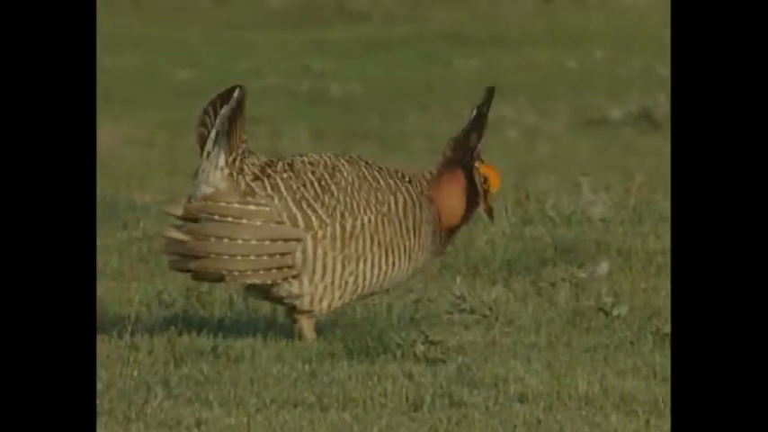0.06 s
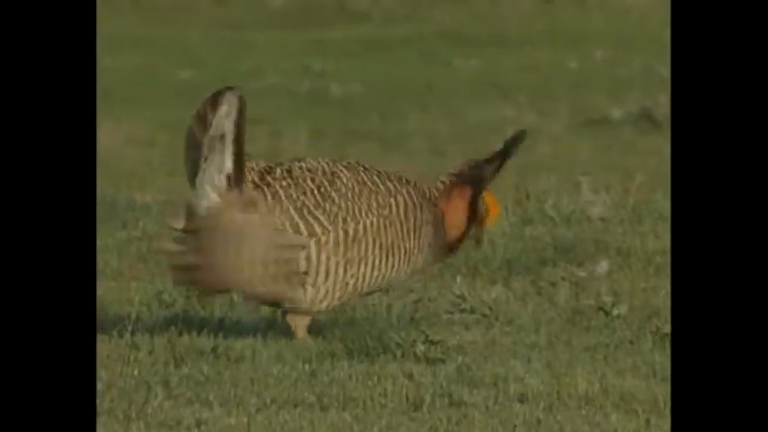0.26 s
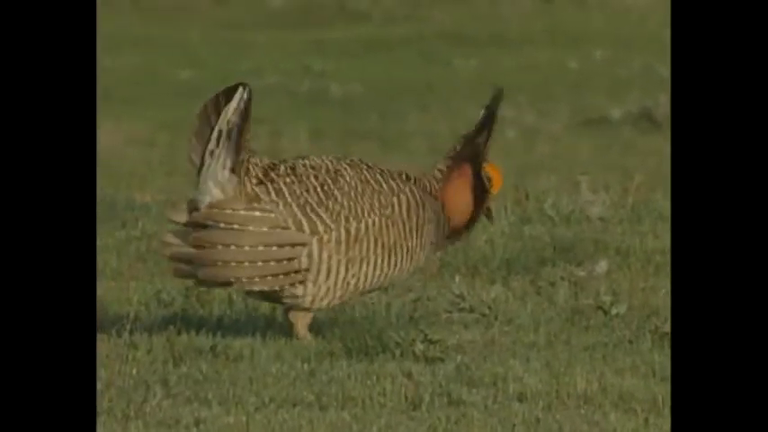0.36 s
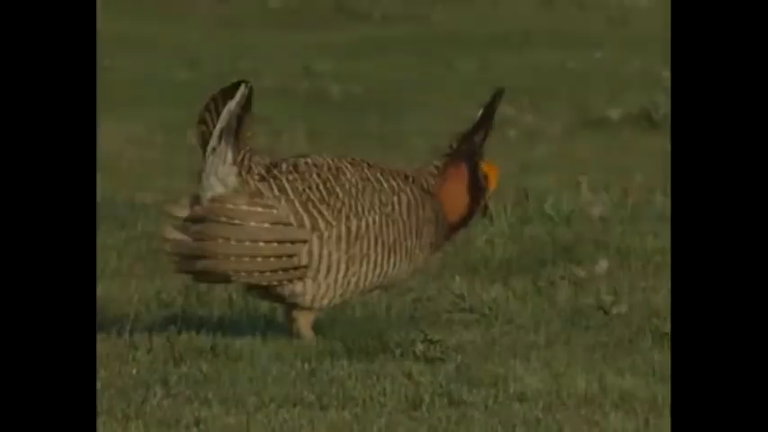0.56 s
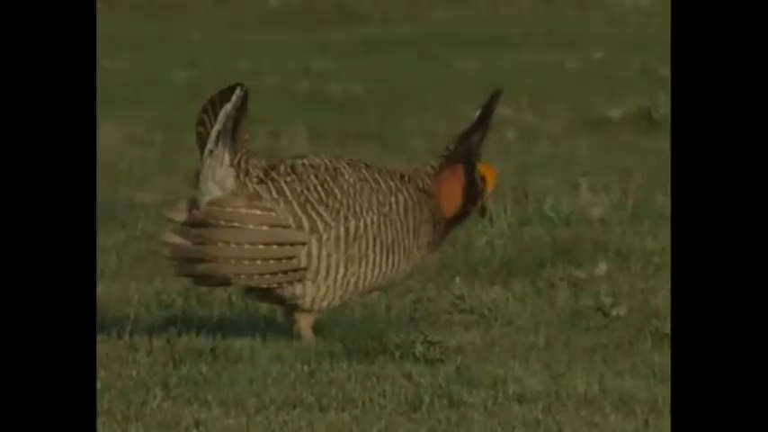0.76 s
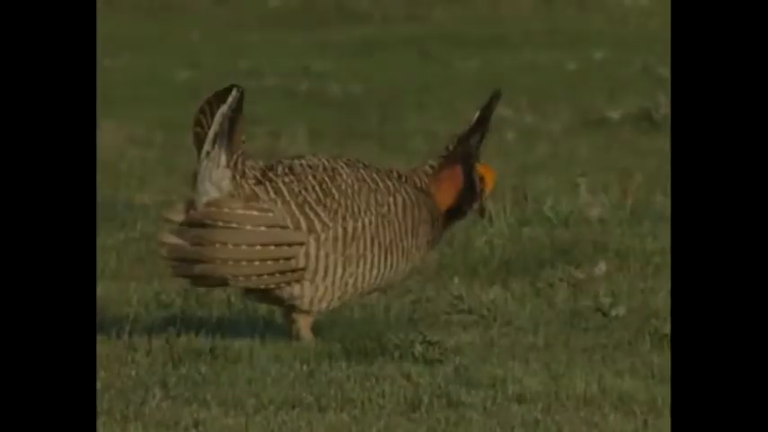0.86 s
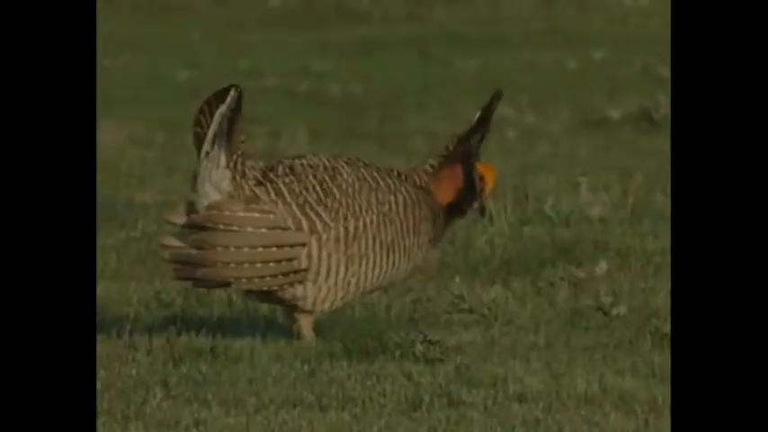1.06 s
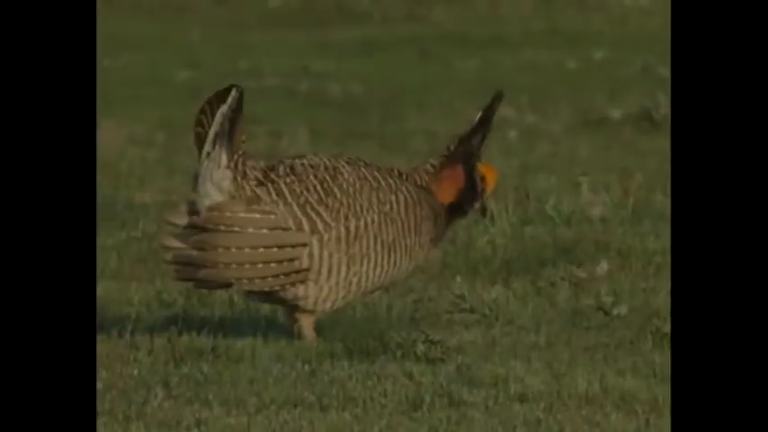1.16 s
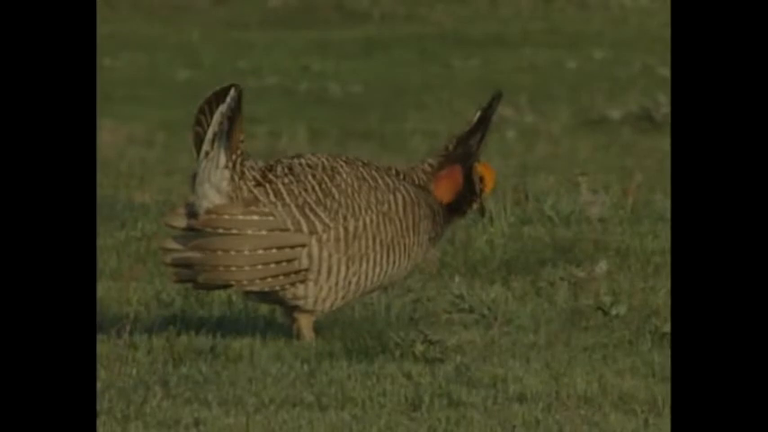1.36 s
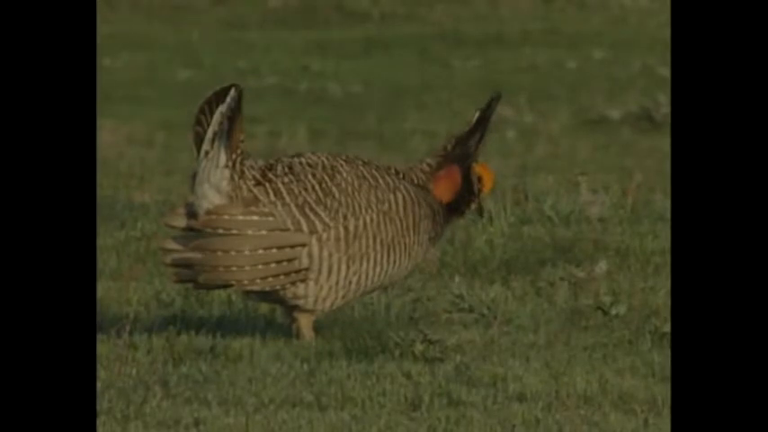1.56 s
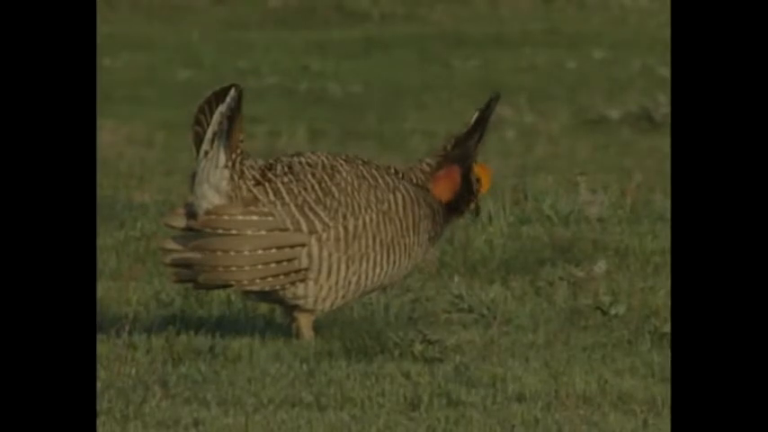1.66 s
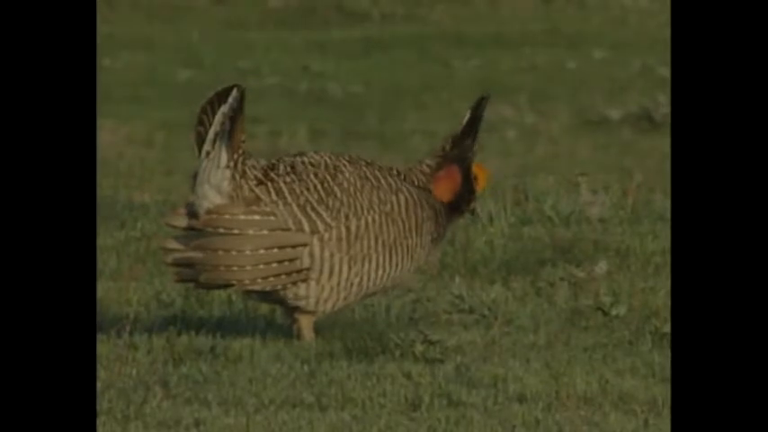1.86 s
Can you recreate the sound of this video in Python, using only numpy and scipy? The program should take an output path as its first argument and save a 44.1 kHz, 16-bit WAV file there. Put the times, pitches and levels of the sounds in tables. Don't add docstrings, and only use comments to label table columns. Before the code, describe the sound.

Bubbling low grouse gobbles tumble over each other, then three cracking hoots, over soft wind rumble.

```python
import sys
import numpy as np
from scipy import signal
from scipy.fft import rfft, irfft
from scipy.io import wavfile
from scipy.ndimage import uniform_filter1d

SR = 44100
rng = np.random.default_rng(int(sys.argv[2]) if len(sys.argv) > 2 else 0)


def generate_wav(signal):
    frames = np.transpose(np.atleast_2d(signal))
    scaled = np.clip(frames, -1, 1) * 32767
    pcm = np.round(scaled).astype(np.int16)
    wavfile.write(sys.argv[1], SR, pcm)


def ratio_of_db(decibels):
    return 10 ** (np.asarray(decibels, float) / 20)


N = 83790
T = np.arange(N) / SR


def walk(rate):
    k = int(SR / rate)
    held = np.repeat(rng.standard_normal(N // k + 1), k)
    return 1.41 * uniform_filter1d(uniform_filter1d(held, k), k)[:N]


def curve(s, v, smooth_s):
    return uniform_filter1d(np.interp(T, s, v), int(smooth_s * SR) + 1)


def gate(s):
    edge_s = .007
    return np.clip(np.minimum(T - s[0] + edge_s, s[-1] + edge_s - T) / edge_s, 0, 1) ** 2


def turn(hz):
    return 2 * np.pi * (np.cumsum(hz) / SR + rng.random())


def coloured(points, db):
    hz, gain = np.array(points, float).T
    f = np.maximum(np.arange(N // 2 + 1) * SR / N, 1)
    weight = ratio_of_db(np.interp(np.log(f), np.log(hz), gain, -70, -70))
    x = irfft(rfft(rng.standard_normal(N)) * weight, N)
    return x * ratio_of_db(db) / x.std()


def throat(s, hz, partial_db):
    phase = turn(curve(s, hz, 0.0013) + 6 * walk(61.06))
    tone = 0
    for k, db in enumerate(partial_db, 1):
        tone = tone + ratio_of_db(curve(s, db, 0.0054)) * np.sin(k * phase)
    return np.sqrt(2) * tone * gate(s) * ratio_of_db(1.2 * walk(89.84))


# t/s, f/Hz, level/dB
GOBBLE_A = [(.206, 617, -46), (.22, 540, -39), (.229, 813, -41.5), (.24, 845, -48.5), (.273, 737, -53)]
GOBBLE_B = [(.235, 419.2, -61), (.256, 484.6, -50.5), (.271, 496, -39.5), (.281, 645, -36.5),
            (.292, 925, -41.5), (.3, 986, -65)]
GOBBLE_C = [(.285, 680, -44), (.3, 769, -52), (0.313, 793, -55.5), (0.322, 718, -50), (0.335, 831, -42.5),
            (.346, 738, -34.5), (.356, 584, -31.5), (0.367, 474, -38.5)]
GOBBLE_D = [(.308, 503, -59), (.322, 629, -58), (.329, 562, -41.5), (0.337, 390, -48.5),
            (.355, 421.4, -42.5), (0.365, 460, -66)]
GOBBLE_E = [(.372, 494, -42), (.387, 585, -34), (0.398, 718, -47), (.413, 585, -44), (0.422, 614, -43)]
GOBBLE_F = [(0.39, 468, -38.5), (.4, 558, -41.5), (0.406, 534.5, -57), (0.42, 500, -63),
            (0.441, 474, -43.5)]
GOBBLE_G = [(0.391, 832.6, -54), (0.405, 994, -42.5), (0.42, 805, -38.5), (0.431, 885, -53.5),
            (0.442, 845, -47), (0.46, 901, -44)]
GOBBLE_H = [(.436, 542, -52.5), (.443, 643, -33), (.451, 742, -45), (0.471, 866, -43.5),
            (0.478, 810, -47.5), (0.487, 675, -39.5), (0.502, 640, -50)]
GOBBLE_I = [(0.597, 700, -64), (0.619, 654.4, -58), (0.691, 667, -56.5)]
# t/s, f/Hz, level/dB
RIPPLE = [(.4, 720, -41), (.41, 559.6, -45), (0.419, 473, -54), (.43, 641, -52), (.44, 448, -46.5),
          (.452, 520, -56)]
# t/s, f/Hz, level/dB
SLUR_A = [(.51, 535, -40.5), (0.525, 634, -31.5), (0.535, 686, -37), (0.54, 725, -31), (.548, 844, -56.5)]
SLUR_B = [(.618, 561.3, -67.5), (.65, 569, -48), (0.67, 537, -48), (0.68, 555, -61), (.7, 549, -38),
          (0.708, 574, -45), (.718, 753, -40)]
SLUR_C = [(0.817, 738, -70), (.829, 541, -65), (.862, 534, -50), (0.88, 507, -54), (0.886, 533, -63.5),
          (0.911, 538, -44.5), (.922, 647, -45)]
# t/s, f/Hz, level/dB
FAR_A = [(1.28, 561, -63.5), (1.295, 413, -64.5), (1.334, 510.4, -57.5), (1.364, 409, -64),
         (1.387, 544, -57.5), (1.396, 740, -73)]
FAR_B = [(1.43, 448.6, -61), (1.446, 706, -67), (1.48, 662, -76.5), (1.495, 493, -71), (1.509, 655, -57),
         (1.524, 740, -97)]
# t/s from its start, f/Hz, relative level/dB
STEP_SHAPE = [(0, 500, -6), (.028, 584, 1), (0.039, 798, -6), (.065, 800, -7), (.085, 750, -7)]
# t/s, level/dB
STEPS = [
    (0.0, -66),
    (0.112, -64.5),
    (1.186, -78),
]


def glides():
    steps = [np.array(STEP_SHAPE) + (at, 0, db) for at, db in STEPS]
    pure = [GOBBLE_B, GOBBLE_C, GOBBLE_D, GOBBLE_E, GOBBLE_F, GOBBLE_G, GOBBLE_H, GOBBLE_I, RIPPLE,
            SLUR_A, FAR_A, FAR_B] + steps
    rich = [GOBBLE_A, SLUR_B, SLUR_C]
    out = 0
    for group, octave_db in ((pure, -36), (rich, -17)):
        for rows in group:
            s, hz, db = np.array(rows, float).T
            weakening = np.maximum(hz - 565, 0) * .3 + np.maximum(db + 50, 0) * 1.3
            out = out + throat(s, hz, [db, db + octave_db - weakening])
    return out


# t/s of the break, level/dB, lead-in stretch, tail stretch, pitch factor
BREAKS = [
    (0.5766, -38.5, 1.3, 0.78, 0.97),
    (0.745, -40, 1.2, 1.05, 1),
    (.954, -40, 0.837, 0.92, 1.01),
]
# t/s from the break, f/Hz, tone level/dB, air-sac level/dB
BREAK_SHAPE = [(-.017, 620, -22.5, -64), (-.011, 789, -2.5, -48), (-.006, 748, -7.5, -41),
               (0, 713, 8.5, -45), (.004, 491, -9, -12), (.008, 420, -12, -3.5), (0.015, 373, -17.5, -4.5),
               (0.025, 350, -23.5, -5), (0.032, 340, -28, -26)]


def broken_notes():
    twelfth_db, sac_top_hz = -28.5, 775
    s, hz, tone, octave = np.array(BREAK_SHAPE, float).T
    out = 0
    for at, db, lead, tail, pitch in BREAKS:
        when = at + np.where(s < 0, lead, tail) * s
        faint = db + octave + twelfth_db
        out = out + throat(when, pitch * hz, [db + tone, faint, faint])
        out = out + throat(when, pitch * np.minimum(2 * hz, sac_top_hz), [db + octave])
    return out


# f/Hz, spectral level/dB
NOISE_BAND = [(200, -15), (500, -6), (850, -4), (1100, 2.5), (1450, -6.5), (1650, -22)]


def loud_noise(lek):
    loudness = np.sqrt(np.abs(uniform_filter1d(lek ** 2, SR // 50)))
    return coloured(NOISE_BAND, -38) * loudness


# t/s, f/Hz, level/dB, buzz depth 0-1
CHIRPS = [
    [(.007, 1590, -73, .03), (.012, 1715, -68, .03), (.018, 1835, -62, .03), (.024, 1880, -59, .08),
     (.029, 1890, -60, .5), (.037, 1875, -60, .3), (.047, 1835, -60, .25), (.055, 1770, -66, .45),
     (.061, 1660, -80, .5)],
    [(1.408, 1570, -68, .03), (1.414, 1730, -60, .03), (1.423, 1845, -52, .04), (1.427, 1848, -51, .42),
     (1.435, 1835, -53, .4), (1.441, 1853, -50, .15), (1.449, 1835, -51, .2), (1.455, 1750, -58, .55),
     (1.461, 1610, -76, .6)],
]
# multiple of the pitch, level/dB
CHIRP_ORDERS = [(1, -21.5), (2, 2.5), (3, 2), (4, -10.5), (5, -35), (6, -27.5)]


def chirps():
    buzz_spread, low_side, second_side, rasp_depth = 0.59, .12, 1, 0.21
    onset_bright_db = 9
    out = 0
    for rows, buzz_hz in zip(CHIRPS, (305, 350)):
        s, hz, db, buzz = np.array(rows, float).T
        pitch = curve(s, hz, 0.0032)
        phase = turn(pitch + 8 * walk(400))
        side = np.exp(1j * turn(buzz_hz + buzz_spread * (hz.max() - pitch) + 45 * walk(300)))
        depth = np.clip(curve(s, buzz, 0.0018), 0, .6)
        rasp = rasp_depth * (walk(2500) + 1j * walk(2500))
        lowness = np.clip((hz.max() - pitch) / (hz.max() - hz[0]), 0, 1)
        note = 0
        for k, gain_db in CHIRP_ORDERS:
            upper = side + second_side * (k / 2 - .7) * depth * side ** 2
            lower = low_side * (k - 1) / side
            partial = np.imag(np.exp(1j * k * phase) * (1 + depth * (upper + lower + rasp)))
            note = note + ratio_of_db(gain_db + onset_bright_db * max(k - 3, 0) * lowness) * partial
        out = out + np.sqrt(2) * note * ratio_of_db(curve(s, db, 0.0022)) * gate(s) ** 20
    return out


# start t/s, length t/s, first f/Hz, last f/Hz, level/dB
WHISTLES = [(0.909, 0.083, 2750, 2610, -76), (1.06, 0.181, 3386, 3250, -76),
            (1.345, 0.068, 2065, 2025, -70), (1.73, .028, 1390, 1370, -78.5),
            (1.846, 0.052, 1775, 1770, -66.5), (0.225, 0.024, 5000, 4970, -77),
            (1.198, 0.036, 1715, 1700, -79), (1.548, 0.026, 3350, 2500, -82),
            (1.464, 0.024, 2300, 2070, -79), (1.9, .018, 2560, 2550, -80.5), (1.73, 0.067, 2250, 2400, -88),
            (1.838, 0.011, 1450, 1770, -73), (.11, .035, 1850, 2000, -81.5), (.955, 0.042, 1820, 2000, -85)]
# start t/s, length t/s, first f/Hz, last f/Hz, level/dB
COOS = [(1.56, 0.041, 590, 498, -66.5), (1.593, 0.042, 485, 462, -66.5), (1.532, 0.033, 480, 570, -75),
        (1.713, .035, 400, 470, -71), (1.758, 0.02, 540, 530, -74), (1.779, .014, 540, 630, -67.5),
        (1.792, 0.029, 600, 450, -70), (1.826, .016, 500, 590, -70), (1.845, 0.019, 820, 706, -65),
        (1.859, 0.036, 430, 404, -65), (1.87, 0.031, 830, 770, -70), (1.051, 0.016, 740, 740, -68.5),
        (1.082, 0.012, 760, 740, -72), (1.193, .02, 420, 457, -68), (1.397, 0.0338, 428, 440, -71),
        (1.403, .02, 640, 606, -63)]


def whistles():
    swell, fade = 0.4, 0.1
    out = 0
    for at, length, hz0, hz1, db in WHISTLES + COOS:
        u = (T - at) / length
        env = np.clip(np.minimum(u / swell + 0.2, (1 - u) / fade), 0, 1) * np.clip(u * 10, 0, 1)
        pitch = hz0 + (hz1 - hz0) * np.clip(u, 0, 1) + 5 * walk(50.25)
        out = out + np.sqrt(2) * ratio_of_db(db + 1.86 * walk(60.1)) * env * np.sin(turn(pitch))
    return out


# t/s, level/dB
GUST = [(0, -65.5), (.2, -61), (.28, -48.5), (.42, -51.5), (.63, -47.5), (.72, -57), (.9, -63.5),
        (1.0, -55), (1.151, -53), (1.25, -60), (1.48, -56), (1.9, -67)]
# f/Hz, spectral level/dB
BUFFET = [(15, -8), (30, -1), (95, -1), (125, -8.5), (160, -45)]
# f/Hz, spectral level/dB
RUMBLE = [(60, -9.5), (90, -4), (110, 0), (132, -9.5), (152, -23.5), (230, -16.5), (500, -31.5),
          (900, -40.5)]


def wind():
    s, db = np.array(GUST).T
    gust = coloured(BUFFET, 0.5) * ratio_of_db(curve(s, db, 0.034) + 0.5 * walk(21.1))
    return gust + coloured(RUMBLE, -57.5) * ratio_of_db(0.76 * walk(13.9))


# f/Hz, level/dB, decay time t60/s
TICK_MODES = [(750, -2, 0.01), (1220, 2, 0.0037), (1780, -2.5, 0.0041), (2720, -14, 0.0043),
              (3940, -3, 0.0028)]


def motor():
    turn_s, ticks_at_s, jitter_s = .05005, (.0144, .0403), .0005
    tick_db, scatter_db = -66.5, 2.5
    at = (np.arange(0, N / SR, turn_s)[:, None] + ticks_at_s).ravel()
    chance = rng.standard_normal((len(at), 1 + len(TICK_MODES)))
    where = np.clip(((at + jitter_s * chance[:, 0]) * SR).astype(int), 0, N - 1)
    t = T[:SR // 50]
    out = 0
    for k, (hz, db, t60) in enumerate(TICK_MODES):
        hits = np.zeros(N)
        hits[where] = ratio_of_db(tick_db + db + scatter_db * chance[:, k + 1])
        ring = np.sin(2 * np.pi * hz * t) * np.exp(-np.log(1000) * t / t60)
        out = out + signal.fftconvolve(hits, ring)[:N]
    return out


def hum():
    return ratio_of_db(-92 + 2.2 * walk(9.2)) * np.sqrt(2) * np.sin(turn(np.full(N, 11025)))


def scatter(x):
    n = SR // 8
    tail = rng.standard_normal(n) * np.exp(-np.arange(n) / SR / .025)
    return ratio_of_db(-26) * signal.fftconvolve(x, tail / np.sqrt(np.sum(tail ** 2)))[:N]


# f/Hz, spectral level/dB
HISS = [(300, 8.5), (1200, 1), (6000, -2), (12600, -2)]
# f/Hz, spectral level/dB
SIDE_HISS = [(1500, -14), (5000, -10), (12600, -5.5)]


def scene():
    lek = glides() + broken_notes()
    birds = lek + scatter(lek) + chirps() + whistles()
    mid = birds + loud_noise(lek) + motor() + wind() + coloured(HISS, -73) + hum()
    treble = signal.sosfilt(signal.butter(4, 1130, "high", fs=SR, output="sos"), birds)
    side = coloured(SIDE_HISS, -90.5) - ratio_of_db(-23.5) * treble + ratio_of_db(-6) * loud_noise(lek)
    return np.array([mid + side, mid - side])


def low_pass(x):
    return signal.sosfilt(signal.butter(12, 12420, fs=SR, output="sos"), x)


def record(dry):
    return low_pass(dry)


dry = scene()
out = record(dry)
generate_wav(out)
```